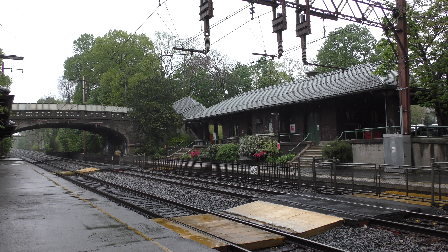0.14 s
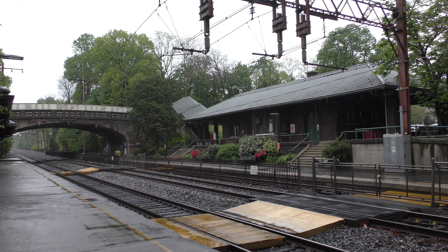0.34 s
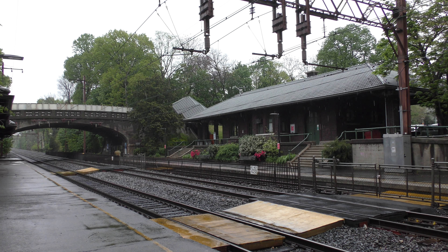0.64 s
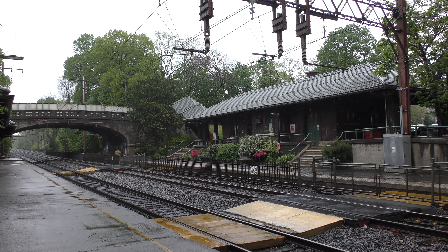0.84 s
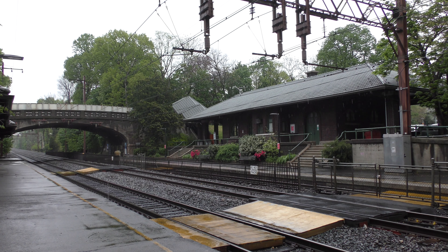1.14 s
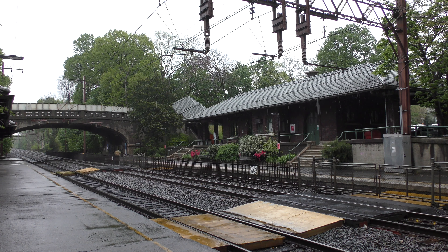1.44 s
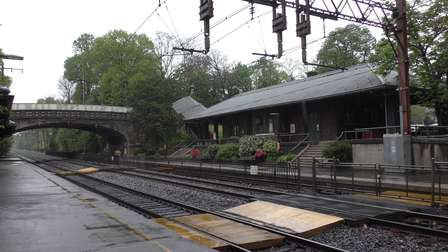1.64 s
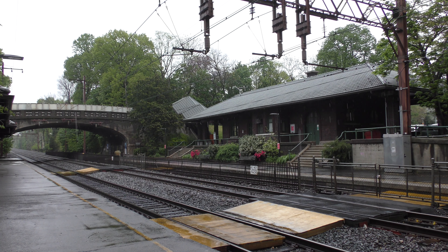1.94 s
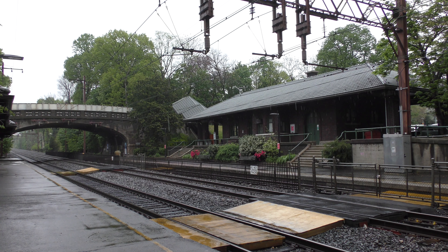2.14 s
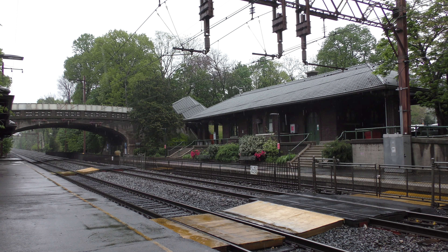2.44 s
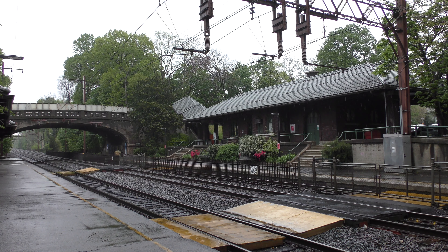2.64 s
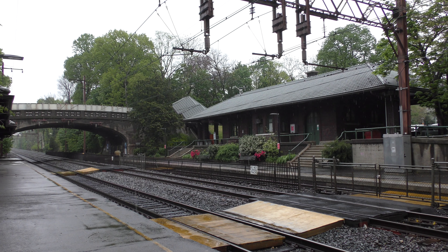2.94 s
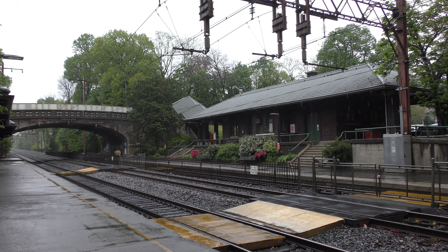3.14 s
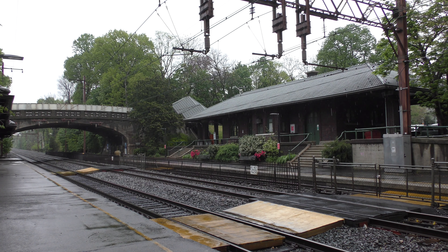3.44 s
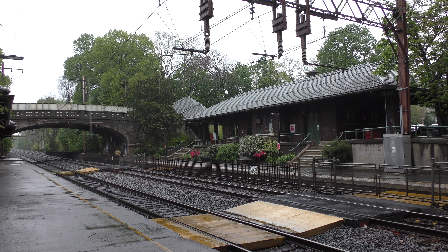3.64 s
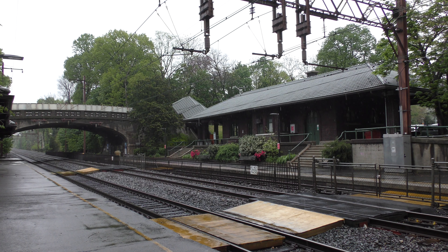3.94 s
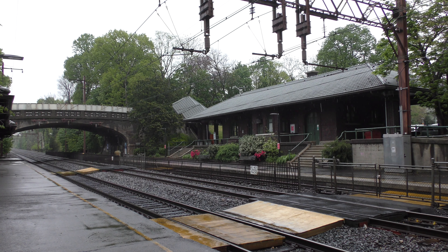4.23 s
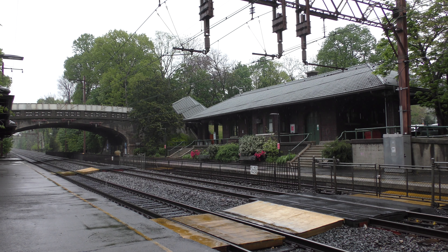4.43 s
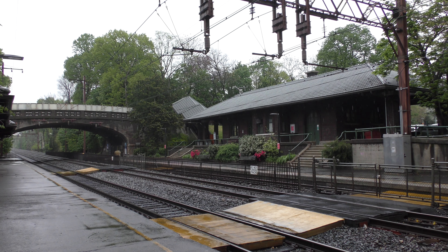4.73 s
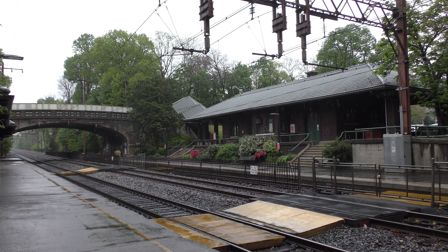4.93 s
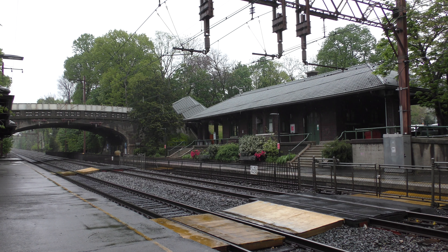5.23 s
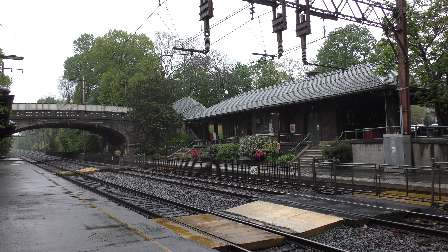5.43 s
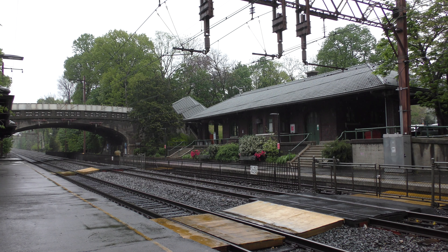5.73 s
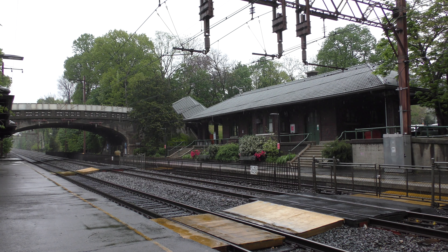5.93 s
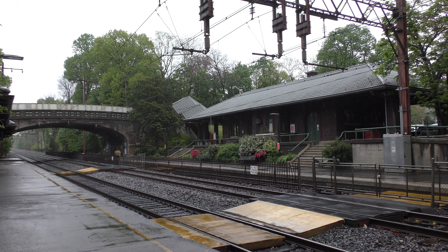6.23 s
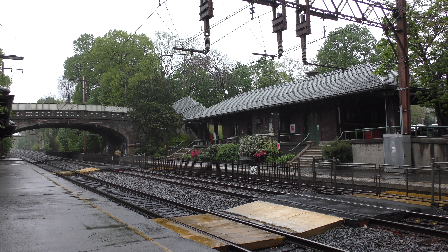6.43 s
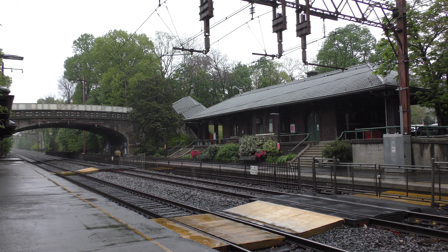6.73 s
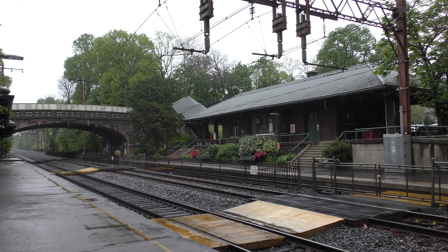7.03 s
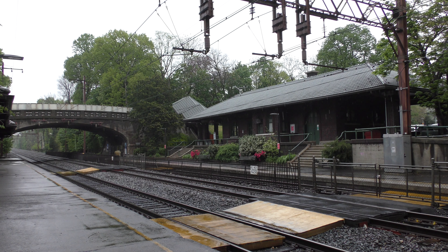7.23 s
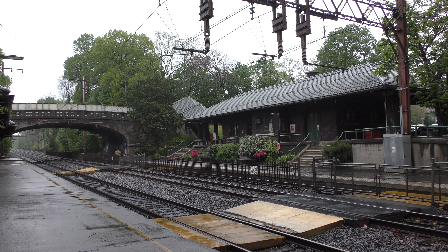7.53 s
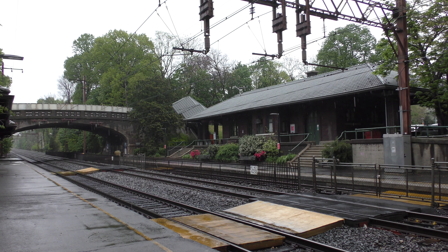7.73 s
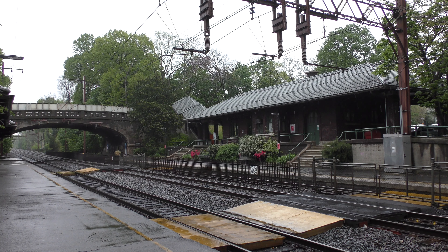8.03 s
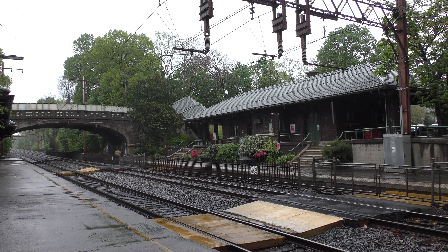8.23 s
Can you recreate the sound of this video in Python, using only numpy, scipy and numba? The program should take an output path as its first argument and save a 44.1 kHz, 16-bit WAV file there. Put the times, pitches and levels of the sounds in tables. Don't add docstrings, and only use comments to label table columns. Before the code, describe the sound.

Steady, fairly soft rain hiss with fine droplet patter runs throughout on a wet open-air platform. Close above the microphone, heavy drips hit taut fabric: hollow thumps around 250 to 550 hertz, with a wet slap and short, dull canopy ring. Moderate knocks fall at 0, 0.6, 0.75 and 1.1 seconds, a strong one at 1.5, then a huge overloaded thump at 1.9. Smaller knocks cluster from 2.3 to 3.0; another huge hit lands at 3.7. Medium ones follow at 4.1 and 4.7 to 4.8, a strong one at 5.1, a faint casing thud at 5.7, and a knock at 5.9. The deepest loud thump comes at 6.5, then a strong one at 7.45; only light taps remain until about 8.3. Tiny stiff ticks scatter between. Overloads crackle, briefly duck the rain, and the first two especially shed faint, bright, fading trickles.

```python
import sys
import numpy as np
from scipy import signal
from scipy.io import wavfile
from scipy.ndimage import uniform_filter1d
from numba import njit

SR = 44100
rng = np.random.default_rng(int(sys.argv[2]) if len(sys.argv) > 2 else 0)


def gain_from_db(level_db):
    decades = np.asarray(level_db, float) / 20
    return 10 ** decades


def to_wav(s):
    ch = np.atleast_2d(s).T
    pcm = np.round(np.clip(ch, -1, 1) * 32767)
    wavfile.write(sys.argv[1], SR, pcm.astype(np.int16))


N = 369116

# start in seconds, peak level in dB, main pitch in Hz,
# level of the low modes in dB, brightness in dB.
DRIPS = [(0.0147, -12, 431, -25, -5.5), (0.5676, -12, 557, -31, -35), (0.7412, -6.5, 343, -11.5, -12.5),
         (1.0614, -10.5, 389, -24.5, -18), (1.5174, -2.5, 517, -8, -11.5), (1.8998, 1.5, 354, -7.5, -12),
         (1.9326, -12.5, 169.5, -12, -14), (2.3005, -12.5, 317, -9, -12.5), (2.3704, -13.5, 540, -41, -23),
         (2.5658, -10, 500, -18, -8), (2.7755, -11.5, 410, -16, -4.5), (3.02, -10.5, 293, -5, -8),
         (3.719, 1.9, 351, -12.5, -20.5), (4.0895, -4.5, 294, -7.5, -11.5), (4.705, -14, 585, -18, 7.5),
         (4.764, -8, 417, -19, -13), (4.8385, -13, 330, -9, -10.5), (5.0454, -12.5, 358, -14, -8),
         (5.101, -0.5, 386, -9, -9.5), (5.885, -7.5, 417, -23, -13.5), (6.067, -13, 527, -4, -25),
         (6.4637, 2, 242, -5, -11), (7.4118, -9, 380, -15.5, -18), (7.4444, 0.4, 475, -17, -9)]
# start in seconds, extra level on top of the drip's own in dB.
OVERLOADS = [
    (1.898, 9),
    (3.717, 6),
    (6.462, 1),
]


def unit(x):
    return x / np.sqrt(np.mean(x ** 2))


def add(out, start_s, burst):
    i = max(int(start_s * SR), 0)
    out[i:i + len(burst)] += burst[:N - i]


def walk(rate):
    hold = int(SR / rate)
    steps = np.repeat(rng.standard_normal(N // hold + 1), hold)
    return 1.33 * uniform_filter1d(uniform_filter1d(steps, hold), hold)[:N]


def band(x, hz, width):
    edges = [hz - width / 2, min(hz + width / 2, 0.45 * SR)]
    return signal.sosfilt(signal.butter(2, edges, "bandpass", fs=SR, output="sos"), x)


def all_drips():
    # start in seconds, peak level in dB,
    # main pitch in Hz, brightness in dB.
    droplets = [(0.0442, -22.5, 398, -15), (0.146, -24.5, 382, -17), (1.3907, -26, 329, -17),
                (1.635, -37, 535, 8), (1.9654, -30.5, 496, -24), (3.009, -19.5, 328, -20),
                (2.258, -25.5, 560, -4), (2.7366, -27, 1070, -36), (3.1426, -31, 515, -10),
                (3.2041, -28, 527, -20), (3.2381, -28.5, 166, 6), (3.3493, -32, 198, 0),
                (4.4716, -22, 478, -0.5), (4.542, -21, 376, -30), (4.59, -29.5, 235, -6),
                (5.0567, -26, 348, -2), (5.1616, -28, 553, 2), (5.4456, -22.5, 479, -31),
                (5.906, -24.5, 595, -9), (6.093, -25.5, 440, -17), (6.633, -34, 356, -20),
                (6.6505, -25, 844, -12), (6.6718, -32.5, 700, 6), (6.823, -22.5, 410, -15),
                (7.43, -24, 297, -20), (7.5129, -26, 430, -32), (3.036, -18, 288, -22),
                (7.8772, -19.5, 390, -25), (7.9382, -22.5, 368, -14), (8.14, -33, 136, -27)]
    # peak level in dB, length in cycles of its pitch.
    cycle_counts = [
        (-25, 3.77),
        (1, 3.27),
        (2.5, 1.86),
    ]
    shortest_ms = 3.87
    rows = [tuple(row) for row in DRIPS]
    for s, db, hz, high_db in droplets:
        low_db = -17 - 21.5 * np.log2(hz / 380)
        rows.append((s, db, hz, low_db, high_db))
    timed = []
    for row in rows:
        cycles = np.interp(row[1], *np.transpose(cycle_counts))
        timed.append(row + (max(1000 * cycles / row[2], shortest_ms),))
    return timed


def drips(width=0.53, skirt_db=-12, lead_ms=0.82, late_ms=0.51, uneven_db=1.96, damping=1.29,
          ring_db=-17, rise=0.072, fall=0.72, smear=0.19, glide=0.38, packet_db=11):
    # pitch in Hz, time to fade by 60 dB in seconds.
    fabric = [(105, 0.072), (135, 0.22), (160, 0.16), (190, 0.1), (215, 0.15), (245, 0.19), (280, 0.1),
              (312, 0.11), (345, 0.13), (378, 0.097), (410, 0.12), (445, 0.11), (480, 0.12), (520, 0.17),
              (565, 0.1), (610, 0.15), (665, 0.11), (725, 0.065), (790, 0.039), (870, 0.05), (960, 0.055),
              (1080, 0.029), (1220, 0.026), (1400, 0.045)]
    hz, t60 = np.transpose(fabric)
    out, ms = np.zeros(N), np.arange(int(0.2 * SR))[:, None] * 1000 / SR
    rows = all_drips()
    chance = rng.standard_normal((len(rows), 3, len(hz)))
    for (s, db, main_hz, low_db, high_db, length), (size, turn, free) in zip(rows, chance):
        uneven = gain_from_db(uneven_db * size)
        main = np.exp(-0.5 * (np.log(hz / main_hz) / width) ** 2)
        skirt_levels = [low_db, skirt_db, high_db, high_db - 34.5]
        skirt = gain_from_db(np.interp(np.log(hz), np.log([150, 380, 750, 1400]), skirt_levels))
        since_ms = np.maximum(ms - 4 + lead_ms - late_ms * np.log(main_hz / hz), 0)
        angle = 2 * np.pi * hz * (ms - 5.2) / 1000

        patch_fade = np.exp(-since_ms / (fall * length * (main_hz / hz) ** 0.21))
        patch = skirt * uneven * patch_fade * np.cos(angle + smear * length * turn)

        far_db = 0.72 * (length - 8) - 0.31 * (max(db, -24) + 8.5)
        canopy_fade = np.exp(-np.log(1000) * damping * since_ms / 1000 / t60)
        canopy = (main + skirt) * uneven * gain_from_db(ring_db + far_db) * (1 - np.exp(-since_ms / 4))
        canopy = canopy * canopy_fade * np.cos(angle + np.pi * free)
        knock = ((1 - np.exp(-since_ms / (rise * length))) ** 2 * (patch + canopy)).sum(axis=1)

        v = np.maximum(ms[:, 0] - 2.6, 0) / length
        sinking_hz = main_hz * np.exp(-glide * (np.minimum(v, 1.6) - 0.45))
        turns = np.cumsum(sinking_hz * (v > 0)) / SR
        packet = np.sin(2 * np.pi * turns) * (1 - np.exp(-v / 0.18)) ** 2 * np.exp(-(v / 0.77) ** 2)
        knock = knock - gain_from_db(packet_db) * packet

        over_db = sum(extra for when, extra in OVERLOADS if abs(when - s) < 0.01)
        add(out, s - 0.004, knock * gain_from_db(db + over_db) / np.abs(knock).max())
    return out


def slaps(cycles=1.11, lag_ms=-2.367):
    out = np.zeros(N)
    for s, db, main_hz, _, high_db in DRIPS:
        hz = 960 * (main_hz / 380) ** 0.4
        turns = np.arange(int(8 * SR / hz)) * hz / SR
        swell = (turns / cycles * np.exp(1 - turns / cycles)) ** 2
        slap_db = 1.63 * db - 17.5 + 0.72 * (high_db + 9.5)
        add(out, s + lag_ms / 1000, np.sin(2 * np.pi * turns) * swell * gain_from_db(slap_db))
    t = np.arange(int(0.0072 * SR)) / 0.0009 / SR
    for s, over_db in OVERLOADS:
        crack = unit(band(rng.standard_normal(len(t)), 2800, 3700))
        add(out, s, crack * t * np.exp(1 - t) * gain_from_db(-53 + 2.32 * over_db))
    return out


def thud():
    # start in seconds, peak level in dB, length in milliseconds.
    casing_hit = (5.7, -26.5, 7.6)
    s, db, ms = casing_hit
    u = (np.arange(N) / SR - s) * 1000 / ms - 0.65
    return gain_from_db(db + 7.5) * np.sin(2 * np.pi * u) * np.exp(-0.5 * (u / 0.26) ** 2)


def ticks(splash_db=-7, spread=0.05, crack_db=-6, tail_db=-14):
    # start in seconds, peak level in dB, pitch in Hz, share of the casing ring in dB.
    small_drops = [(0.156, -34, 3300, -11), (0.8802, -29, 2350, -26), (1.358, -30, 3000, -14),
                   (1.8145, -39, 4730, -27), (1.8317, -35.5, 2370, -12), (1.856, -43, 5700, -25),
                   (2.091, -33, 2000, -8), (2.12, -36, 3220, -11), (4.5895, -32, 2350, -30),
                   (2.2952, -25, 1650, -14), (2.331, -29, 3120, -9), (2.3986, -32, 3650, -15),
                   (2.4807, -36, 3280, -16), (2.81, -37, 1450, -8), (2.961, -32.5, 3160, -10.5),
                   (3.236, -21, 2965, -10), (3.349, -28, 1950, -8), (3.4236, -38, 2360, -16),
                   (3.909, -29, 2300, -18), (4.1844, -35, 1730, -6), (4.589, -30.5, 8200, -14.5),
                   (5.1606, -30.5, 1590, -18), (5.3256, -38, 5800, -19), (5.347, -31, 4770, -8),
                   (5.5247, -37.5, 1680, -7), (5.5867, -38, 1800, -14), (6.0456, -34.5, 1860, -19),
                   (6.6313, -37, 3100, -21), (6.6482, -24, 2730, -28), (3.2376, -24, 2260, -28)]
    casing_hz = 4157
    out, t = np.zeros(N), np.arange(int(0.06 * SR)) / SR
    chance = rng.standard_normal((len(small_drops), len(t)))
    for (s, db, low_hz, high_db), noise in zip(small_drops, chance):
        t60 = 0.0097 * gain_from_db(-0.25 * (db + 24.5))
        cluster = 2 * np.pi * t * (1 + spread * np.array([[0], [noise[0]], [noise[1]]]))
        upper = np.clip(gain_from_db(high_db + 7), 0, 0.97)
        rib_ring = np.sqrt(1 - upper ** 2) * np.sin(low_hz * cluster)
        casing_ring = upper * np.sin(casing_hz * cluster)
        centre = low_hz + upper * (casing_hz - low_hz)
        splash = gain_from_db(splash_db) * unit(band(noise, centre, 0.55 * centre))
        ring = (rib_ring + casing_ring).sum(axis=0) + splash
        fade = np.exp(-np.log(1000) * t / max(t60, 0.004))
        tick = ring * (1 - np.exp(-t / 0.00067)) ** 2 * (fade + gain_from_db(tail_db) * fade ** 0.13)
        crack = unit(band(noise[::-1], 1.1 * centre, 1.2 * centre))
        tick = tick + gain_from_db(crack_db) * crack * (t / 0.00093) * np.exp(1 - t / 0.00061)
        add(out, s, tick * gain_from_db(db) / np.abs(tick).max())
    return out


def trickle(count=24000, grain_ms=5.7, grain_db=4.5, wash_db=-7):
    # centre in Hz, width in Hz, level in dB.
    whistle_bands = [(2000, 525, -10.5), (3250, 520, 1.5), (4270, 720, -2.5), (5340, 1500, -1),
                     (6440, 930, -2.5), (7700, 1600, -11), (9730, 1000, -5), (11600, 1900, -9.5),
                     (13000, 1500, -3), (15300, 800, -7)]
    out = np.zeros(N)
    bands = np.array(whistle_bands)[rng.integers(len(whistle_bands), size=count)]
    starts = rng.uniform(2.1, 5.5, count)
    offsets = rng.standard_normal(count)
    lengths, sizes = rng.exponential(size=(2, count))
    for (hz, width, level_db), s, off, long, size in zip(bands, starts, offsets, lengths, sizes):
        t = np.arange(int(grain_ms * (0.12 + long) * SR / 1000)) / SR
        whistle = np.hanning(len(t)) * np.sin(2 * np.pi * (hz + off * width / 2) * t)
        add(out, s, whistle * gain_from_db(level_db + grain_db * min(size, 3.0)))
    wash = unit(band(rng.standard_normal(N), 10000, 13000)) * gain_from_db(wash_db + 1.5 * walk(40))
    lag_s, rise_s, dry_db_per_s = 0.016, 0.03, 8
    flow = 0
    for s, over_db in OVERLOADS:
        since = np.maximum(np.arange(N) / SR - s - lag_s, 0)
        shed_db = -74 + 2.3 * over_db - dry_db_per_s * since
        flow = np.maximum(flow, (1 - np.exp(-since / rise_s)) * gain_from_db(shed_db))
    return (unit(out) * gain_from_db(1.5 * walk(70)) + wash) * flow


def rain(grains_per_s=300, grain_db=6.0, grain_share=0.52, flicker_db=1.61, swell_db=0.4):
    # time in seconds, level in dB.
    rain_strength = [(0.0, 2.5), (0.56, 0), (1.85, -2.5), (2.2, 2), (2.8, 1.5), (4.2, 1.5), (5.22, 0.5),
                     (6.451, -3), (6.8, 0.5), (7.34, -2), (7.88, -1), (8.37, -2)]
    # frequency in Hz, level in dB per Hz.
    rain_colour = [(25, -35), (40, 1.5), (80, -5), (125, 1), (250, 1), (500, -1.5), (1000, -1),
                   (2000, -4.5), (4000, -10), (6300, -13.5), (7300, -19.5), (9000, -19.5), (13000, -22.5),
                   (16000, -21.5)]
    rain_db, side_db = -49, -29.5
    strength = np.interp(np.arange(N) / SR, *np.transpose(rain_strength))
    patter_db = 0.96 * strength
    colour_hz, colour_db = np.transpose(rain_colour)
    shared = rng.standard_normal((2, N))
    wide = unit((shared[0] > 2.9) * shared[1])
    mid, side, swell = 0, 0, walk(2.92)
    for hz in 28 * 2 ** np.arange(0, 9.3, 1 / 4):
        hiss, lateral, when = rng.standard_normal(N), rng.standard_normal(N), rng.random(N)
        click_sizes = gain_from_db(grain_db * np.minimum(rng.exponential(size=N), 3.0))
        clicks = (when < grains_per_s / SR) * click_sizes * np.sign(hiss)
        wet = np.interp(hz, [5500, 8500], [1, 0.35])
        mix = hiss + wet * grain_share * (unit(clicks) + 0.5 * wide) * (hz > 200)
        high = np.interp(np.log(hz), np.log([1200, 4000]), [0, 1])
        db = np.interp(np.log(hz), np.log(colour_hz), colour_db) + flicker_db * walk(14)
        db = db + wet * ((1 - high) * patter_db + high * strength + swell_db * swell)
        mid = mid + gain_from_db(db) * band(mix, hz, hz * 0.19)
        side = side + gain_from_db(db) * band(lateral, hz, hz * 0.24)
    usual = np.sqrt(np.median(uniform_filter1d(mid ** 2, size=2048)))
    return np.array([mid, side * gain_from_db(side_db)]) * gain_from_db(rain_db) / usual


def scene():
    low_cut_hz, left_db = 110, 0.42
    low_cut = signal.butter(3, low_cut_hz, "highpass", fs=SR, output="sos")
    near = signal.sosfilt(low_cut, drips()) + slaps() + thud()
    mid, side = rain()
    bright = ticks() + trickle()
    mid = mid + bright
    side = side + gain_from_db(-28) * np.roll(bright, shift=9)
    return np.array([near * gain_from_db(left_db) + mid + side, near * gain_from_db(-left_db) + mid - side])


@njit
def follow(x, attack, release):
    out, e = np.empty(len(x)), 0.
    for i in range(len(x)):
        e += (x[i] - e) * (attack if x[i] > e else release)
        out[i] = e
    return out


def low_pass(x):
    return signal.sosfilt(signal.butter(12, 16470, fs=SR, output="sos"), x)


def record(dry):
    attack_s, release_s, top_hz = 0.00048, 0.064, 15800
    loud = follow(np.abs(dry).max(axis=0), 1 / (attack_s * SR), 1 / (release_s * SR))
    held = dry / np.maximum(uniform_filter1d(loud, size=48) / 0.55, 1) ** 0.94
    rounded = held / (1 + np.abs(held) ** 8) ** (1 / 8)
    top_cut = signal.ellip(10, 0.2, 70, top_hz, fs=SR, output="sos")
    return low_pass(signal.sosfilt(top_cut, rounded))


dry = scene()
out = record(dry)
to_wav(out)
```